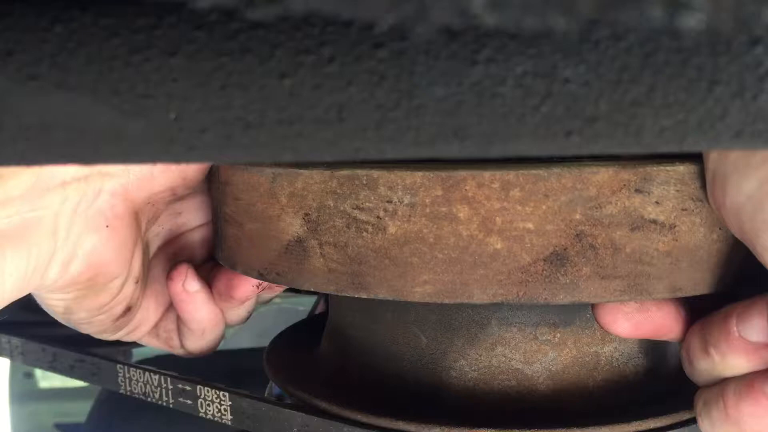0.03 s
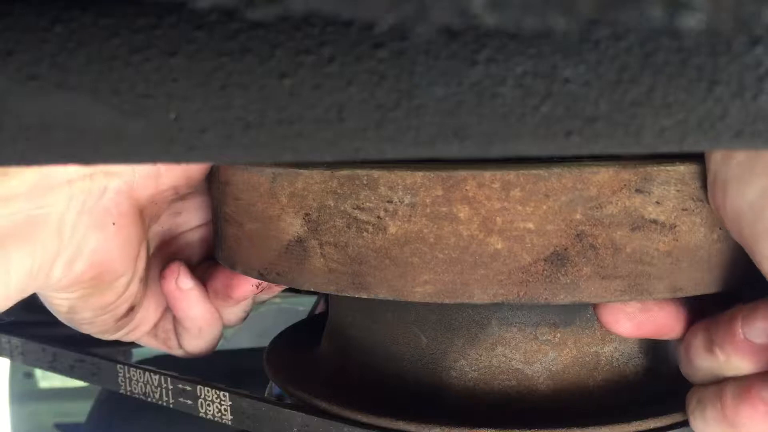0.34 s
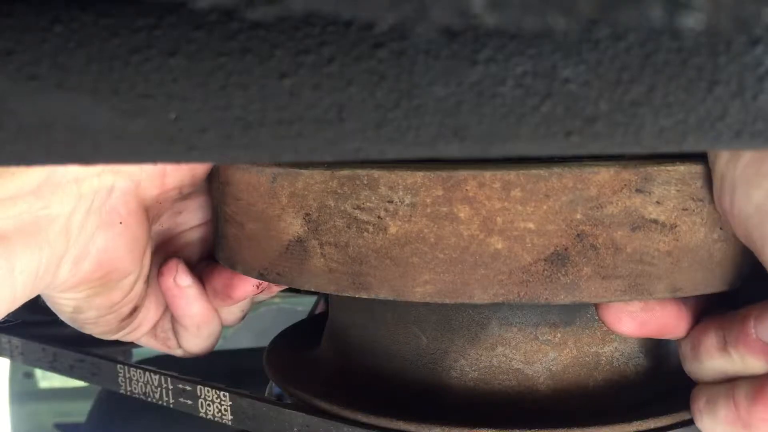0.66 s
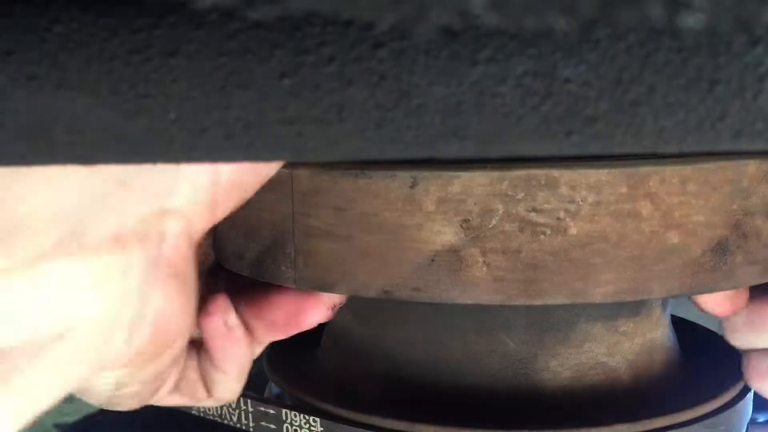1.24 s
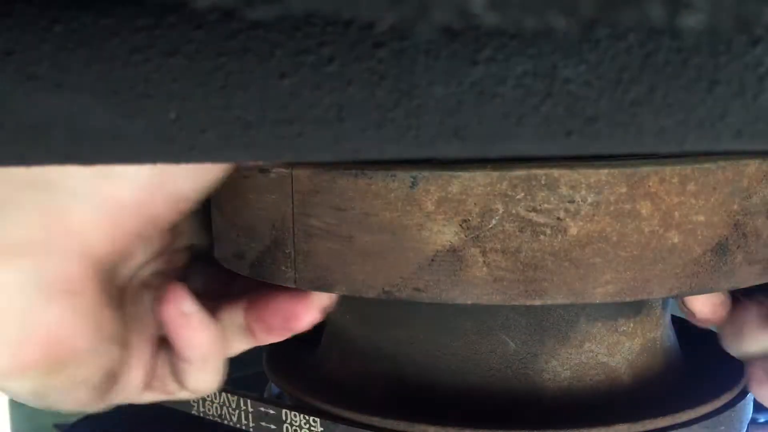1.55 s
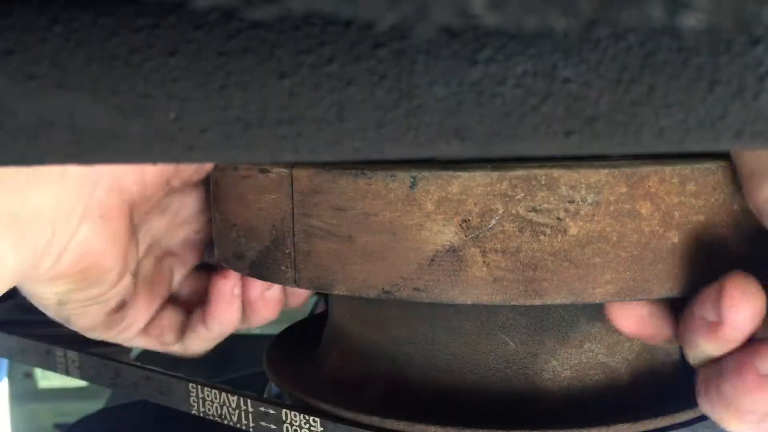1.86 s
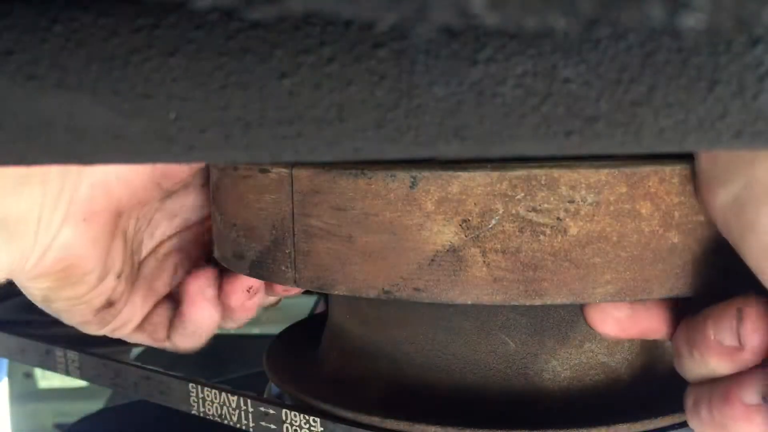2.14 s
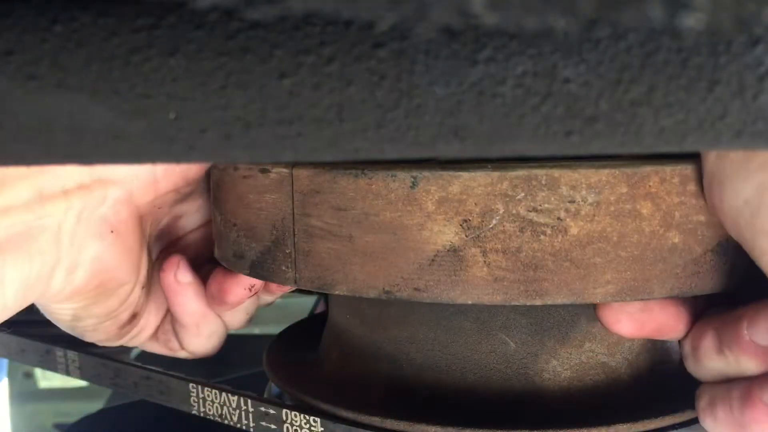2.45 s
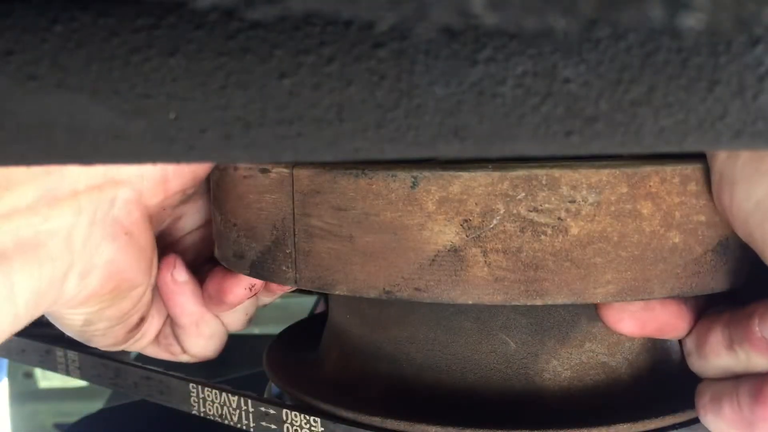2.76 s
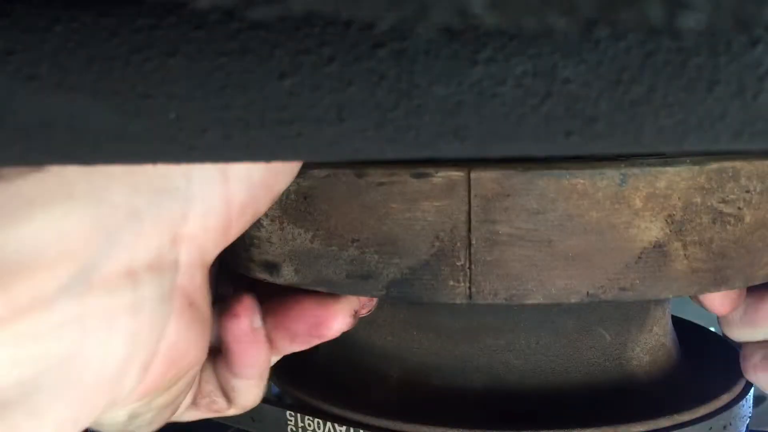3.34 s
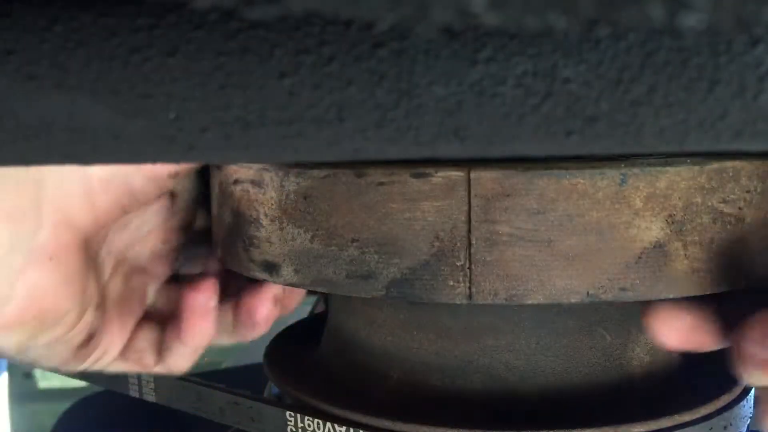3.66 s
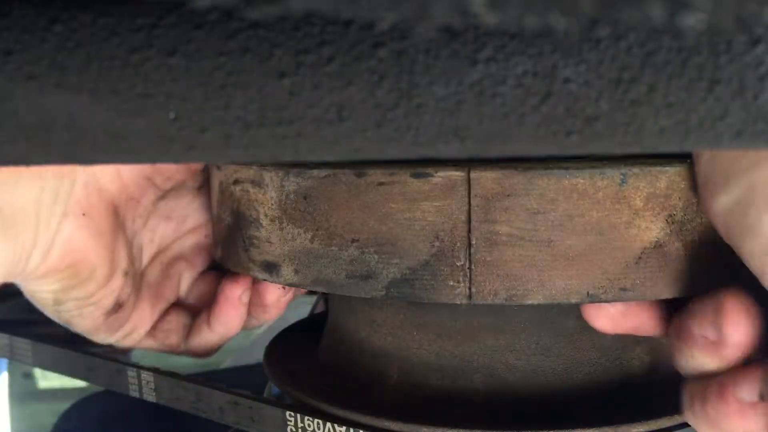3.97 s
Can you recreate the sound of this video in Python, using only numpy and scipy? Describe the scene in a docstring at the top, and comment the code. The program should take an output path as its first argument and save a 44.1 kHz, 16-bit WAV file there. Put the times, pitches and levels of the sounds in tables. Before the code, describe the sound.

Faint rubbing and small taps of hands turning a metal wheel twice, above a low rumble.

```python
"""A low outdoor rumble is heard first, with deep hums swelling and fading in it. Over it, two hands turn
a rusty pulley wheel in an engine bay in two short pulls, sliding back for a new grip after each.
Friction makes the rubbing: skin scuffs over rust grains and the wheel rasps briefly as it moves.
Impact makes the ticks, bumps and knocks of fingers on the metal, whose modes die away quickly.
Reflections from the nearby metal walls give the rubbing a boxed-in colour."""
import sys
import numpy as np
from scipy import signal
from scipy.fft import rfft, irfft
from scipy.io import wavfile
from scipy.ndimage import uniform_filter1d, map_coordinates

SR = 44100
rng = np.random.default_rng(int(sys.argv[2]) if len(sys.argv) > 2 else 0)


def to_wav(s):
    """Save 16-bit WAV."""
    ch = np.atleast_2d(s).T  # columns
    pcm = np.round(np.clip(ch, -1, 1) * 32767)  # PCM
    wavfile.write(sys.argv[1], SR, pcm.astype(np.int16))


N = 176400
T = np.arange(N) / SR

# background spectra (f/Hz, relative level/dB)
RUMBLE_SPECTRUM = [(20, -36), (34, -14), (46, 2), (60, 1), (82, 2), (97, -4.5), (150, -8.5), (200, -12.5),
                   (260, -12), (340, -18.5), (450, -29.5), (800, -65.5)]
WASH_SPECTRUM = [(200, -7.5), (450, -1.5), (570, 3), (780, -1), (980, 4), (1350, -2.5), (1750, 0.5),
                 (2050, -6), (2350, -17), (3100, -25), (4500, -30), (9000, -37)]
HISS_SPECTRUM = [(1500, 17), (4000, 2.5), (6000, 1.5), (9000, 1.5), (10500, -7.5), (12000, 0.5),
                 (16000, -8)]
# envelopes of the background and of the creeping grip (t/s, level/dB)
RUMBLE_ENVELOPE = [(.12, -34.5), (2.3, -36.5), (4.0, -37)]
WASH_ENVELOPE = [(.12, -49.5), (.9, -50.5), (1.5, -50.5), (2.3, -51), (3.0, -51), (4.0, -49.5)]
HISS_ENVELOPE = [(.12, -53), (.25, -81), (1.1, -73.5), (1.8, -60.5), (2.3, -73), (3.1, -72.5), (4.0, -63)]
GRIP_ENVELOPE = [(.12, -58.5), (.35, -73.5), (.9, -69.5), (1.2, -73), (2.9, -70.5), (3.203, -67),
                 (4.0, -73)]
# deep hums, skin squeaks and soft bumps of the hands (t/s, length/s, f/Hz, level/dB)
HUM_EVENTS = [(0.855, 1.1, 115.6, -35), (1.446, 0.55, 76, -35.5), (0.018, 0.63, 116, -44),
              (3.65, 0.36, 130, -38)]
SQUEAK_EVENTS = [(0.58, 0.036, 2950, -66.5), (0.818, 0.13, 2700, -66), (0.913, 0.075, 2530, -66),
                 (3.427, 0.073, 3300, -70)]
BUMP_EVENTS = [(1.164, 0.24, 177.5, -38.5), (1.276, 0.064, 380, -43.5), (1.957, 0.12, 79.4, -34.5),
               (2.03, 0.05, 135, -33), (3.188, 0.1, 210, -41), (3.365, 0.13, 60, -32.5)]
# resonances of grip, wheel, hollow under the palms, palm hiss and metal (f/Hz, width/Hz, gain/dB)
GRIP_MODES = [(2418, 330, 10), (2990, 290, -14), (3500, 770, -7)]
WHEEL_MODES = [(1510, 160, 10.5), (1695, 140, 13.5), (2050, 510, 10), (2530, 340, 5.5), (3320, 1140, -6.5),
               (4400, 130, -7), (6200, 4800, -17.5)]
HOLLOW_MODES = [(680, 106, 5), (1274, 230, -2), (1580, 410, -8), (2070, 130, 5.5), (2860, 270, -18)]
PALM_BANDS = [(4390, 290, -1), (6840, 790, -1), (8800, 1700, -0.5), (12000, 3000, -6)]
CLINK_MODES = [(2550, 170, 4), (3620, 350, 2), (3820, 270, -1), (4400, 280, 4), (5200, 680, -1),
               (6450, 550, -6), (7270, 480, 0), (8800, 2600, -10)]
# dry rasps of the moving wheel (t/s, level/dB, decay/s)
RASP_EVENTS = [(1.065, -50, 0.017), (1.2514, -40.5, 0.014), (1.2627, -35, 0.0076), (1.274, -43, 0.011),
               (1.29, -51, 0.035), (3.149, -54.5, 0.033)]
# ticks of grit and fingernails (t/s, level/dB, f/Hz, decay/s)
TICK_EVENTS = [(1.067, -58.5, 8460, 0.01), (1.335, -49, 11000, .002), (1.585, -50, 8000, 0.006),
               (1.649, -57.5, 6400, 0.0046), (2.1132, -48, 14700, 0.002), (2.167, -62, 14500, 0.0033),
               (2.778, -65, 13000, .003), (3.173, -60, 5440, 0.0032), (3.227, -54, 11000, 0.0018),
               (3.275, -53.5, 6500, 0.0032), (3.51, -47, 9000, 0.00082), (3.583, -52.5, 5730, 0.017),
               (3.922, -47, 5430, 0.00086), (3.9367, -50.5, 9000, 0.0013), (3.9698, -56, 11000, 0.00092)]
# fingers landing on the rim (t/s, level/dB, pitch ratio)
KNOCK_EVENTS = [(1.264, -34, 1.005), (1.346, -40.5, 0.89), (1.592, -37, 1.01), (2.097, -38, 1.05),
                (2.1135, -43, 1.1), (2.167, -37, 1.01), (2.182, -39.5, 1), (3.153, -42.5, 0.94),
                (3.511, -36.5, 1.02)]
# modes of the damped rim (f/Hz, gain/dB, decay/s)
RIM_MODES = [(1130, -18, 0.0023), (1520, -7, 0.0034), (1698, 6.5, 0.0038), (1960, -16, 0.0066),
             (2620, -24, 0.0052)]
# skin scuffing over rust (t/s, rise/s, fall/s, body level/dB, hiss level/dB)
SCUFF_EVENTS = [(1.285, 0.041, 0.075, -45.5, -57.5), (1.445, 0.036, 0.023, -67, -63),
                (1.55, 0.037, 0.11, -44.5, -61), (1.99, 0.055, 0.075, -53.5, -66.5),
                (2.148, 0.017, 0.013, -57, -68), (3.205, 0.023, 0.037, -50, -61.5),
                (3.265, 0.033, 0.085, -51.5, -62.5), (3.455, 0.059, 0.097, -50, -62),
                (3.544, 0.039, 0.1, -53, -56.5)]
# spectra of a scuff's body and hiss (f/Hz, relative level/dB)
SCUFF_BODY_SPECTRUM = [(250, -28), (400, 1.5), (540, 1.5), (850, -2.5), (1150, 5), (1400, -8), (1750, 2.5),
                       (2050, 3.5), (2400, -12.5), (3200, -19), (5000, -50)]
SCUFF_HISS_SPECTRUM = [(2000, -4.5), (3500, 0.5), (4500, -1), (7500, -0.5), (10500, -1), (13500, 2),
                       (16000, -7)]
# palms sliding back along the rim (t/s, rise/s, fall/s, level/dB)
SLIDE_EVENTS = [(1.6, 0.15, 0.38, -46.5), (3.56, 0.12, 0.21, -48)]
# clinks as the grip closes (t/s, level/dB, centre of excitation f/Hz)
CLINK_EVENTS = [(2.097, -46.5, 3470), (2.113, -48, 5750), (2.1658, -45, 5500)]
# skin catching on the rim (t/s, length/s, level/dB, f/Hz)
CATCH_EVENTS = [(3.483, 0.021, -49.5, 2010), (3.521, 0.038, -48, 1800), (3.552, 0.037, -44.5, 1800),
                (3.577, 0.045, -47, 1643)]
# echoes from the metal walls of the bay (delay/s, gain/dB)
WALL_ECHOES = [(.00228, -25.5), (.00343, -19.5), (.00511, -8), (.00742, -26), (.0108, -10)]

METAL_ATTACK_S = 0.00083


def undb(db):
    """Amplitude ratio of a level in decibels."""
    return 10 ** (np.asarray(db) / 20)


def unit(x):
    """Normalisation to an rms of 1."""
    return x / np.sqrt(np.mean(x ** 2))


def colour(x, spectrum):
    """Spectral shaping by a curve interpolated in log frequency; the result has unit rms."""
    hz, db = np.array(spectrum).T
    f = np.maximum(np.arange(N // 2 + 1) * SR / N, 1)
    return unit(irfft(rfft(x) * undb(np.interp(np.log(f), np.log(hz), db)), N))


def resonate(x, modes):
    """Resonance: steep pass bands add in power; the result has unit rms."""
    f = np.maximum(np.arange(N // 2 + 1) * SR / N, 1)
    power = sum(undb(db) ** 2 / (1 + ((f - hz * hz / f) / width) ** 2) ** 2 for hz, width, db in modes)
    return unit(irfft(rfft(x) * np.sqrt(power), N))


def drift(rate_hz):
    """Smoothed random steps: a fluctuation of unit rms."""
    hold = max(int(SR / rate_hz), 2)
    steps = rng.standard_normal(N)[np.arange(N) // hold]
    return unit(uniform_filter1d(uniform_filter1d(steps, hold), hold))


def flicker(x, depth_db, band_hz=246.5, rate_hz=25.05):
    """Random amplitude modulation band by band, as when a rubbing contact patch changes."""
    f, t, spectra = signal.stft(x, SR, nperseg=512)
    field = rng.standard_normal((128, 512))
    grid = np.meshgrid(f / band_hz, t * rate_hz, indexing="ij")
    gain = undb(depth_db * map_coordinates(field, grid, mode="mirror"))
    return unit(signal.istft(spectra * gain, SR)[1][:N])


def envelope(points):
    """Amplitude envelope, linear in decibels between points."""
    return undb(np.interp(T, *np.array(points).T))


def swell(start, rise, fall):
    """Raised-cosine envelope: a rounded rise and fall."""
    return np.sin(np.pi / 2 * np.interp(T, [start, start + rise, start + rise + fall], [0, 1, 0])) ** 2


def strike(start, decay, attack):
    """Exponential decay after a sharp attack, with a faint reverberant tail from the bay."""
    age = np.maximum(T - start, 0)
    tail = undb(-23) * np.exp(-age / 0.024)
    return (1 - np.exp(-age / attack)) * (np.exp(-age / decay) + tail)


def burst(x, length):
    """Energy normalisation: a short swell gets an rms of about 1 at its crest."""
    return unit(x) * np.sqrt(length / 2 / T[-1])


def ring(start, modes, detune=0.0053):
    """Free vibration: one contact sets off damped modes, each slightly mistuned."""
    age = np.maximum(T - start, 0)
    out = 0
    for hz, db, decay in modes:
        pitch = hz * (1 + detune * rng.standard_normal())
        out += undb(db) * np.sin(2 * np.pi * pitch * age) * np.exp(-age / decay)
    return (1 - np.exp(-age / METAL_ATTACK_S)) * out


def friction(grains_per_s=12000, spread_db=1.8):
    """Shot noise: dense, tiny slips of uneven size over rust grains."""
    slips = rng.random(N) < grains_per_s / SR
    return slips * rng.standard_normal(N) * undb(spread_db * np.minimum(rng.exponential(size=N), 5))


def background():
    """Filtered noise: a wavering low rumble, a steadier distant wash and a thin hiss."""
    rumble = colour(rng.standard_normal(N), RUMBLE_SPECTRUM) * envelope(RUMBLE_ENVELOPE)
    rumble *= undb(1.4 * drift(rate_hz=16))
    wash = colour(flicker(rng.standard_normal(N), depth_db=2.06), WASH_SPECTRUM)
    wash *= envelope(WASH_ENVELOPE) * undb(0.5 * drift(rate_hz=9.8))
    hiss = colour(rng.standard_normal(N), HISS_SPECTRUM) * envelope(HISS_ENVELOPE)
    return rumble + wash + hiss


def hums(rise_s=0.34, fade_s=0.15, wander=0.0069, waver_db=1.4):
    """Deep pure tones swell and fade under slight frequency and amplitude modulation."""
    phase_per_hz = 2 * np.pi * np.cumsum(1 + wander * drift(rate_hz=7.72)) / SR
    out = 0
    for start, length, hz, db in HUM_EVENTS:
        gate = np.clip(np.minimum((T - start) / rise_s, (start + length - T) / fade_s), 0, 1)
        out += undb(db) * np.sqrt(2) * np.sin(hz * phase_per_hz) * gate
    return out * undb(waver_db * drift(rate_hz=13.18))


def grip():
    """Frictional creep: skin creaks faintly on the rim while the hands hold on."""
    return resonate(flicker(friction(), depth_db=6), GRIP_MODES) * envelope(GRIP_ENVELOPE)


def engine_bay(x):
    """Comb filtering: close reflections interfere with the direct sound."""
    f = np.arange(N // 2 + 1) * SR / N
    response = 1 + sum(undb(db) * np.exp(-2j * np.pi * f * delay) for delay, db in WALL_ECHOES)
    return irfft(rfft(x) * response / np.sqrt(np.mean(np.abs(response) ** 2)), N)


def squeaks(relative_width=0.08):
    """Narrow-band resonance makes the friction of a tight grip whistle."""
    out = 0
    for start, length, hz, db in SQUEAK_EVENTS:
        whistle = resonate(friction(), [(hz, hz * relative_width, 0)])
        out += undb(db) * swell(start, length / 2, length / 2) * whistle
    return out


def rasps():
    """Forced vibration: short bursts of slipping drive the modes of the wheel."""
    slipping = sum(undb(db) * strike(start, decay, METAL_ATTACK_S) for start, db, decay in RASP_EVENTS)
    return resonate(friction(), WHEEL_MODES) * slipping


def ticks(relative_width=0.43):
    """Brief impacts have broad spectra: grit and fingernails give bright cracks."""
    out = 0
    for start, db, hz, decay in TICK_EVENTS:
        band = resonate(rng.standard_normal(N), [(hz, hz * relative_width, 0)])
        out += undb(db) * strike(start, decay, attack=0.0003) * band
    return out


def bumps(relative_width=0.28):
    """Soft contact excites low frequencies: the hands push and the wheel booms briefly."""
    out = 0
    for start, length, hz, db in BUMP_EVENTS:
        boom = resonate(rng.standard_normal(N), [(hz, hz * relative_width, 0)])
        out += undb(db) * burst(boom * swell(start, length / 2, length / 2), length)
    return out


def knocks():
    """Heavy damping: fingers set the rim ringing and stop it at once."""
    return sum(undb(level) * ring(start, [(hz * pitch, db, decay) for hz, db, decay in RIM_MODES])
               for start, level, pitch in KNOCK_EVENTS)


def scuffs(judder_db=2):
    """Roughness noise: skin judders over rust, giving a hollow body with a fine hiss above it."""
    body = colour(flicker(friction(), depth_db=3), SCUFF_BODY_SPECTRUM)
    hiss = colour(flicker(friction(), depth_db=3), SCUFF_HISS_SPECTRUM)
    rubbing = sum(swell(start, rise, fall) * (undb(body_db) * body + undb(hiss_db) * hiss)
                  for start, rise, fall, body_db, hiss_db in SCUFF_EVENTS)
    return rubbing * undb(judder_db * drift(rate_hz=131))


def slides(waver_db=1.37, hiss_db=-25.5, linger=1.55):
    """Cavity resonance: the hollow under the sliding palms colours their rubbing; a hiss trails on."""
    pressure = undb(waver_db * drift(rate_hz=111.2))
    # the resonances shift as the hollow changes shape
    position = np.cumsum(1 + 0.011 * drift(rate_hz=14))
    hollow = map_coordinates(resonate(friction(), HOLLOW_MODES), [position], mode="mirror")
    hiss = undb(hiss_db) * resonate(flicker(friction(), depth_db=6), PALM_BANDS)
    out = 0
    for start, rise, fall, db in SLIDE_EVENTS:
        out += undb(db) * (hollow * swell(start, rise, fall) + hiss * swell(start, rise, fall * linger))
    return pressure * out


def clinks(half_power_octaves=0.34):
    """Selective excitation: each small, hard contact favours one range of the metal's high modes."""
    noise = rng.standard_normal(N)
    out = 0
    for start, level, centre in CLINK_EVENTS:
        modes = [(hz, width, db - 3 * (np.log2(hz / centre) / half_power_octaves) ** 2)
                 for hz, width, db in CLINK_MODES]
        out += undb(level) * strike(start, decay=0.0041, attack=0.0014) * resonate(noise, modes)
    return out


def catches(slip_hz=230, jitter=0.3, decay_s=0.0051):
    """Stick-slip motion: skin lets go in uneven pulses, each ringing the damped rim."""
    out = 0
    for start, length, db, hz in CATCH_EVENTS:
        cycles = np.cumsum(slip_hz * np.exp(jitter * drift(slip_hz))) / SR
        slips = np.diff(np.floor(cycles), prepend=0) * swell(start, length / 2, length / 2)
        rim = signal.fftconvolve(slips, ring(0, [(hz, 0, decay_s)]))[:N]
        out += undb(db) * burst(rim, length)
    return out


def scene():
    """Superposition of the rubbing in the bay, the contacts and the background, in one channel."""
    rubbing = engine_bay(scuffs() + slides() + grip() + squeaks() + rasps())
    return (rubbing + knocks() + catches() + clinks() + ticks() + bumps() + hums() + background())[None]


def record(dry, onset_s=0.12, cutoff_hz=15800):
    """Gating and low-pass filtering: a moment of silence, then sound with its highest treble cut."""
    gate = np.clip((T - onset_s) / 0.002, 0, 1)
    lowpass = signal.ellip(10, 0.2, 70, cutoff_hz, fs=SR, output="sos")
    return signal.sosfilt(lowpass, dry * gate)


dry = scene()
out = record(dry)
to_wav(out)
```